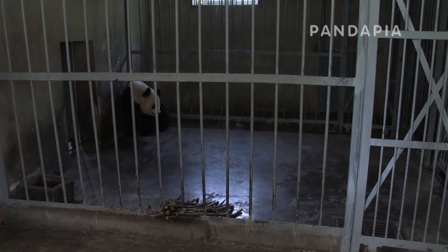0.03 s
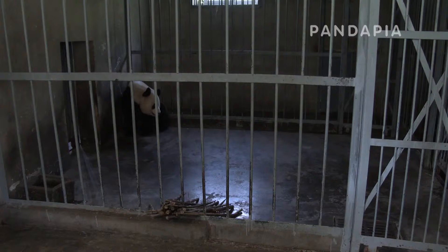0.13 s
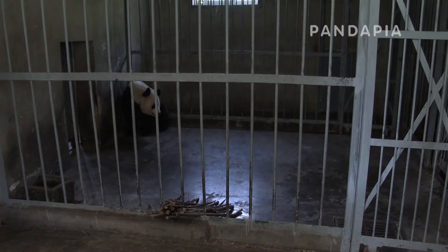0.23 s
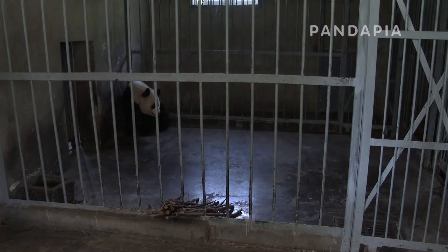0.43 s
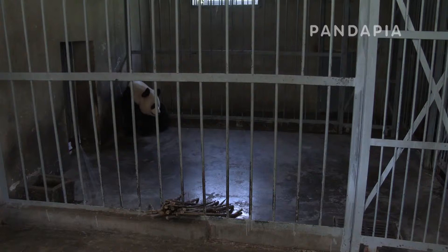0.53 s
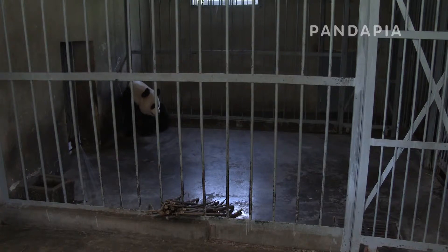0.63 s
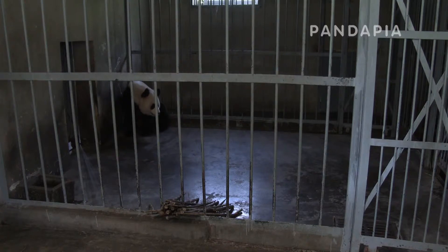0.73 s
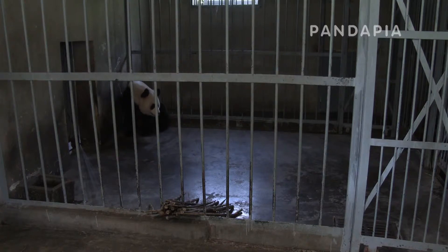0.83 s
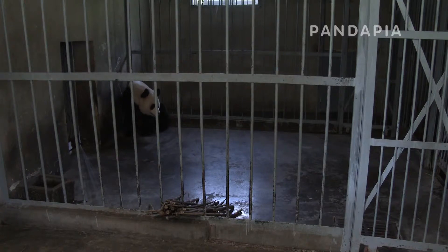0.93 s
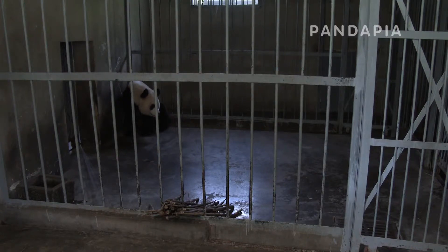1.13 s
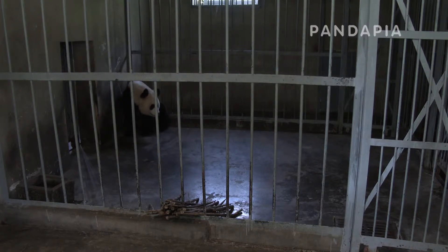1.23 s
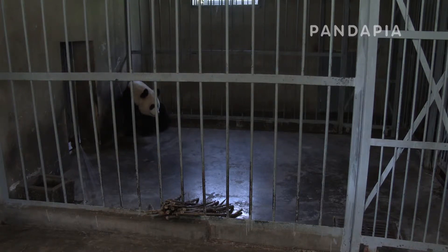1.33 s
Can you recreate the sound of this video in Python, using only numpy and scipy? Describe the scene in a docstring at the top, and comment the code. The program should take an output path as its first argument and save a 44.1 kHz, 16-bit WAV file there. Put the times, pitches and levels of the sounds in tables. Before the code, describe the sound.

A heavy steel gate starts rolling at about 0.1 seconds, some way off in a concrete animal house. It knocks and clinks from 0.25 seconds, then bangs shut with a rattle around 0.5. The metal rings and the echo fades over the next second. A faint whine rises from 0.7 seconds, and a soft scraping hiss enters near 1.3. Ventilation rumbles underneath.

```python
"""A heavy steel gate rolls, knocks, clinks and bangs shut with a rattle, out of sight in a concrete
animal house. Each contact clatters the frame and rings the panel; nearly all of the sound arrives
as echo off the hard walls. A faint whine rises as the echo fades, and a soft scraping hiss comes in
at the end. Ventilation rumbles underneath."""
import sys
import numpy as np
from scipy import signal
from scipy.fft import rfft, irfft, next_fast_len
from scipy.io import wavfile
from scipy.ndimage import map_coordinates

SR = 44100
rng = np.random.default_rng(int(sys.argv[2]) if len(sys.argv) > 2 else 0)


def store_wav(level_fs):
    """Save 16-bit WAV to argv[1]."""
    pcm = np.round(np.clip(np.atleast_2d(level_fs), -1, 1) * 32767)
    wavfile.write(sys.argv[1], SR, pcm.T.astype(np.int16))


N = 61739


def gate():
    """Each contact gives a burst of first reflections, a swelling echo and the panel's ring."""
    # gate contacts: start_s, level_db, treble_db, bass_db
    contacts = [(.249, -42.5, 3.5, 3), (.295, -42, -3, -0.5), (.408, -41.5, 11.5, -0.5),
                (.447, -34.5, -2, -4.5), (.482, -34.5, -1, 1.5), (.577, -45.5, 6.5, 6)]
    # frame clatter spectrum: freq_hz, density_db
    clatter = [(30, -33), (60, -10.5), (130, -15.5), (230, -8), (330, -0.5), (520, 0), (720, -4.5),
               (1350, -8.5), (1750, -12.5), (2600, -18), (3600, -20.5), (5000, -20.5), (7500, -29.5),
               (10000, -36.5), (12500, -37.5), (15500, -45)]
    # treble shelf: freq_hz, share of treble_db
    treble = [(700, 0.011), (2500, 0.5), (4500, 1.03), (15000, 1.08)]
    # bass shelf: freq_hz, share of bass_db
    bass = [(200, 0.96), (600, 0)]
    early_db, early_t60_s, echo_rise_s, ring_db = 0.5, 0.1, 0.014, 1.5
    out, t = np.zeros(N), np.arange(N) / SR
    for start_s, level_db, treble_db, bass_db in contacts:
        early = amp(early_db) * noise(clatter) * np.exp(-np.log(1000) * t / early_t60_s)
        echo = hall_decay(noise(clatter)) * (1 - np.exp(-t / echo_rise_s))
        blow = early + echo + amp(ring_db) * panel_ring(t)
        blow = filtered(blow, lambda hz: amp(treble_db * along(treble, hz) + bass_db * along(bass, hz)))
        start = round(start_s * SR)
        out[start:] += amp(level_db) * blow[:N - start]
    return out


def panel_ring(t, scatter_db=0.5, drift_rad=0.35, rise_s=0.014):
    """Decaying modes of the steel panel, slightly different at every blow."""
    # panel modes: pitch_hz, level_db, t60_s
    modes = [(185.5, -16.5, 1.2), (288.6, -13, 2.2), (315.8, -21, 1.55), (358.4, -22, 1.1),
             (403.1, -5.5, 0.92), (484.8, -14.5, 2.27), (517, -15.5, 1.4), (556.8, -8, 1.49),
             (804, -14, 1.03), (865.4, -16, 1.3), (921, -22.5, 1.5), (1069.5, -16.5, 1.72),
             (1315, -14.5, 1.17), (1394, -17.5, 1.05)]
    ring = np.zeros(N)
    for pitch_hz, level_db, t60_s in modes:
        phase = 2 * np.pi * (pitch_hz * t + rng.random()) + drift_rad * wobble(14.05)
        gain = amp(level_db - scatter_db * rng.standard_normal())
        ring += gain * np.exp(-np.log(1000) * t / t60_s) * np.sin(phase)
    return np.sqrt(2) * ring * (1 - np.exp(-t / rise_s))


def hall_decay(x):
    """Fade each frequency of x at the concrete hall's rate; bass lasts longest."""
    # reverberation time: freq_hz, t60_s
    hall = [(80, 2), (400, 1.52), (1200, 1.42), (2500, 1.36), (5000, 1.13), (9000, 1.18), (15000, 0.9)]
    hz, t, spectrum = signal.stft(x, SR, nperseg=512)
    decay_db = -60 * t / along(hall, hz)[:, None]
    return signal.istft(spectrum * amp(decay_db), SR)[1][:N]


def rolling(flutter_db=0.64):
    """Dull, uneven noise of the moving gate."""
    # rolling envelope, echo included: time_s, level_db
    envelope = [(.1, -42), (.17, -46.5), (.25, -42), (.45, -42.5), (1.1, -61)]
    # rolling spectrum: freq_hz, density_db
    colour = [(59, -41), (100, -28), (146, 5), (258, -15.5), (300, -2.5), (508, -4), (712, -7.5),
              (758, -1.5), (808, -9.5), (1230, -11), (15500, -47)]
    level_db, = curves(envelope)
    return amp(level_db + flutter_db * wobble(39.1)) * noise(colour)


def whine(rough_rad=0.24, echo_db=-2.5):
    """A faint distant tone and its lower octave climb, smeared by the hall."""
    # rising tone: time_s, pitch_hz, level_db
    glide = [(.72, 1290, -60.5), (.83, 1335, -64.5), (.97, 1365, -62), (1.04, 1415, -64.5),
             (1.1, 1435, -57.5), (1.17, 1520, -68.5), (1.26, 1555, -67.5), (1.38, 1580, -69)]
    # lower octave envelope: time_s, level_db
    undertone = [(1.0, -65.5), (1.18, -63), (1.25, -63), (1.39, -78)]
    pitch_hz, level_db = curves(glide)
    under_db, = curves(undertone)
    phase = 2 * np.pi * np.cumsum(pitch_hz) / SR + rough_rad * wobble(120)
    under_phase = phase / 2 + rough_rad * wobble(120)
    tone = np.sqrt(2) * (amp(level_db) * np.sin(phase) + amp(under_db) * np.sin(under_phase))
    tail = hall_decay(rng.standard_normal(N))
    echo = signal.fftconvolve(tone, tail / np.linalg.norm(tail))[:N]
    return tone + amp(echo_db) * echo


def scrape():
    """A soft hiss swells as the echo ends."""
    # hiss envelope: time_s, level_db
    envelope = [(1.15, -103), (1.28, -75), (1.39, -70)]
    # hiss spectrum: freq_hz, density_db
    colour = [(800, -7), (2500, -11), (5000, 5), (8000, 0), (15000, -24)]
    level_db, = curves(envelope)
    return amp(level_db) * noise(colour)


def ventilation(air_db=-51, flutter_db=1.7, drift_rad=0.64):
    """Steady air rumble with two unsteady fan tones."""
    # rumble spectrum: freq_hz, density_db
    colour = [(13, -38), (22, -7), (49, -0.5), (117, -1.5), (150, 0), (182, -3), (227, -6), (253, -14.5),
              (290, 1), (352, -14), (426, -9), (643, -12.5), (779, -8), (1050, -18.5), (1500, -25.5),
              (1680, -21), (1930, -24), (5170, -28.5), (15500, -44)]
    # fan tones: pitch_hz, level_db
    fan_tones = [(44, -64), (146, -63)]
    hum, t = np.zeros(N), np.arange(N) / SR
    for pitch_hz, level_db in fan_tones:
        gain = amp(level_db + flutter_db * wobble(5))
        hum += gain * np.sin(2 * np.pi * pitch_hz * t + drift_rad * wobble(6.02))
    return amp(air_db) * noise(colour) + np.sqrt(2) * hum


def amp(db):
    """Decibels to gain."""
    return 10 ** (np.asarray(db) / 20)


def along(points, hz):
    """Interpolate (freq_hz, value) points on a log frequency axis."""
    freq_hz, values = np.transpose(points)
    return np.interp(np.log(hz + 1), np.log(freq_hz + 1), values)


def curves(rows):
    """One value per sample for each column after time_s."""
    time_s, *columns = np.transpose(rows)
    return [np.interp(np.arange(N) / SR, time_s, column) for column in columns]


def wobble(knots_per_s):
    """Smooth random curve."""
    knots = rng.standard_normal(int(N * knots_per_s / SR) + 4)
    return map_coordinates(knots, [np.arange(N) * knots_per_s / SR])


def filtered(x, gain):
    """Scale the spectrum of x by gain(hz)."""
    size = next_fast_len(N + SR // 2)
    return irfft(rfft(x, size) * gain(np.fft.rfftfreq(size, 1 / SR)), size)[..., :N]


def noise(colour):
    """Noise of rms 1; colour sets only the spectral shape."""
    x = filtered(rng.standard_normal(N), lambda hz: amp(along(colour, hz)))
    return x / np.sqrt(np.mean(x ** 2) + 1e-20)


def scene():
    """All sources centred; gate and scrape have slight width in the treble."""
    # stereo side relative to mid: freq_hz, gain_db
    width = [(3000, -72), (4500, -45), (7000, -36), (10000, -30)]
    mid = gate() + rolling() + whine() + scrape() + ventilation()
    side = filtered(gate() + scrape(), lambda hz: amp(along(width, hz)))
    return np.array([mid + side, mid - side])


def record(dry):
    """Switch on after a brief silence, then low-pass."""
    start_s, cutoff_hz = 0.116, 15720
    switched_on = np.arange(N) >= start_s * SR
    return filtered(dry * switched_on, lambda hz: hz < cutoff_hz)


dry = scene()
out = record(dry)
store_wav(out)
```